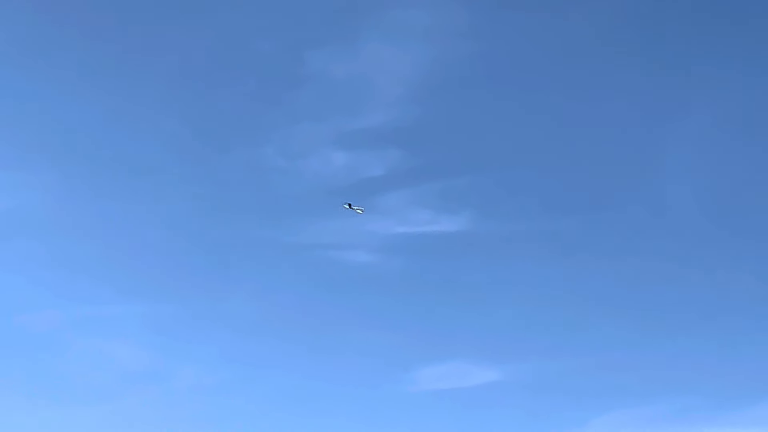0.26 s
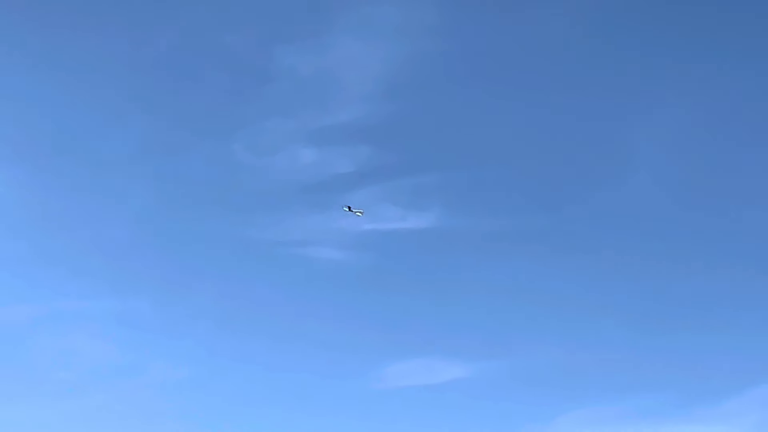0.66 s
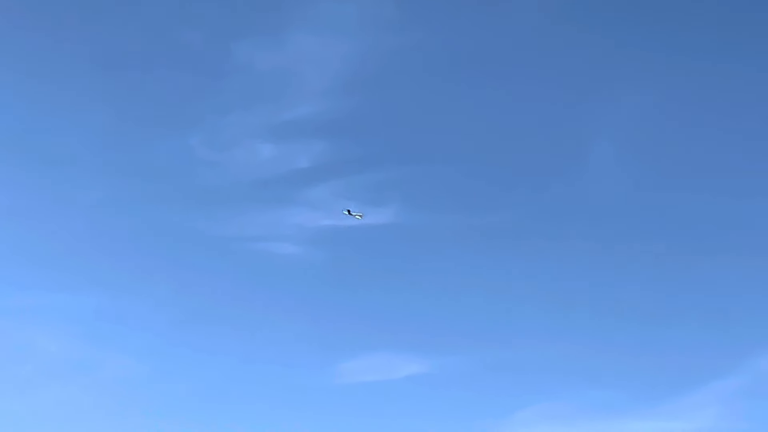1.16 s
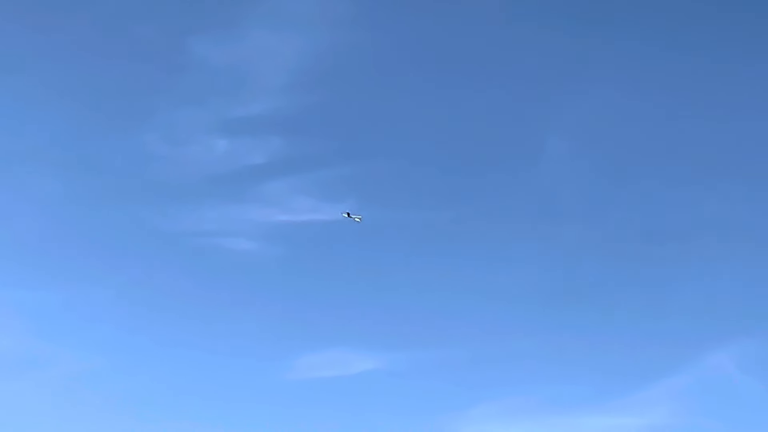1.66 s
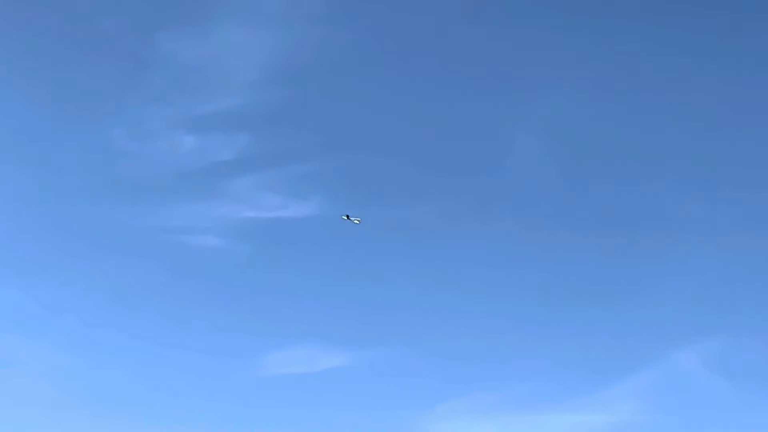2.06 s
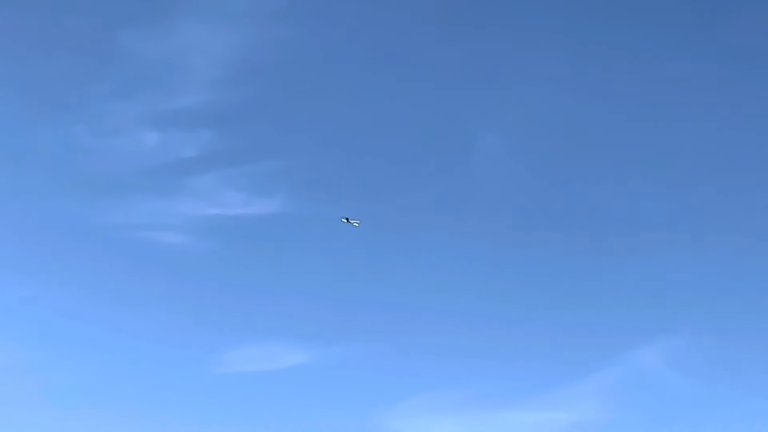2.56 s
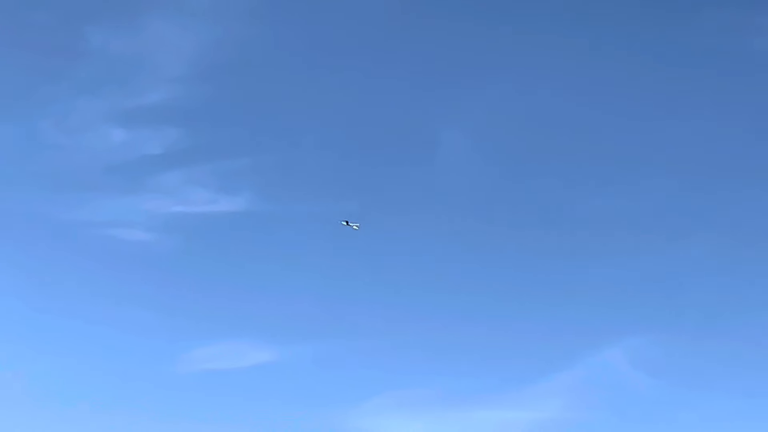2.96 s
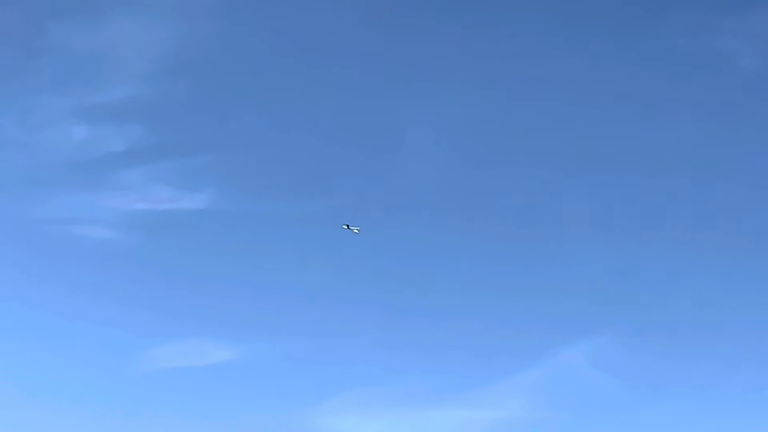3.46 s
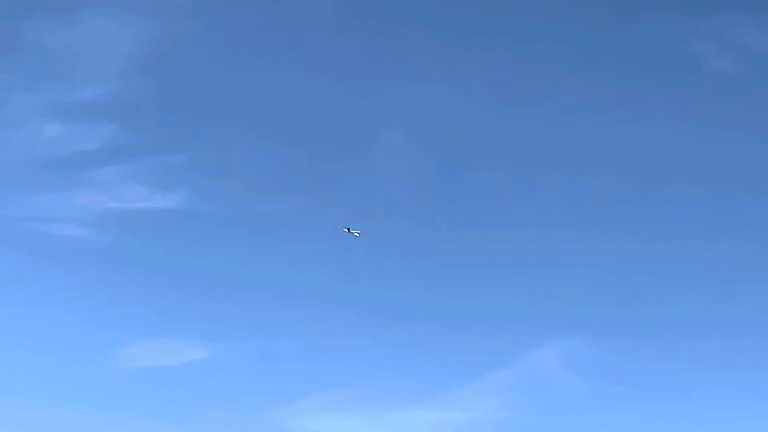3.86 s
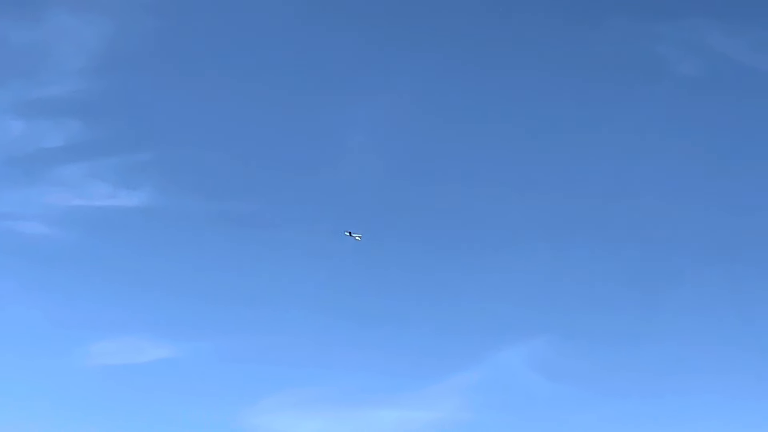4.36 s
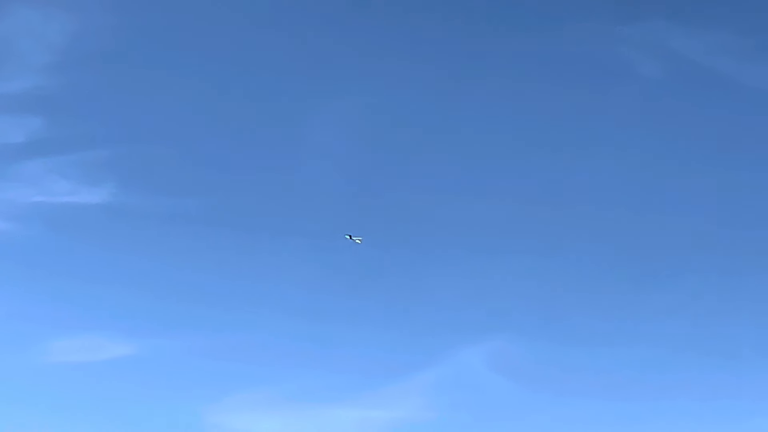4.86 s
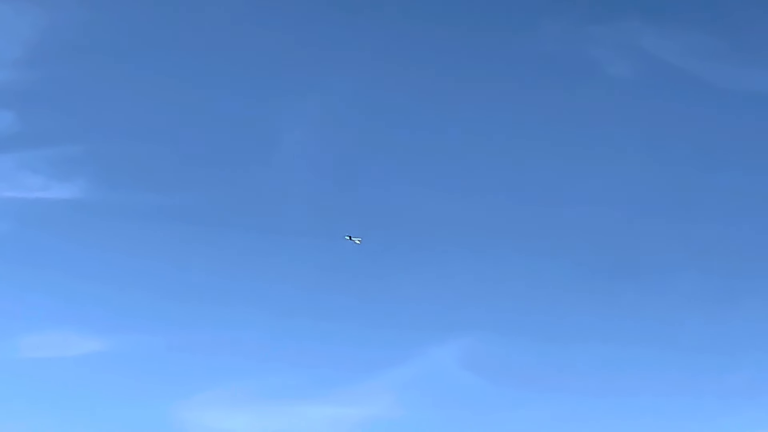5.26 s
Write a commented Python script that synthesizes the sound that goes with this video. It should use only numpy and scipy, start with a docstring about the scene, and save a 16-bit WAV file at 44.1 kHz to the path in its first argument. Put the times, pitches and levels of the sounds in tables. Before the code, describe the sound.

A distant jet plane climbs away outdoors, heard throughout about five and a half seconds as a deep, steady rumble with a crackling roar above it. The roar is strongest and raspiest in the first second, wavering and growing duller, with brief hollow swells drifting through the rumble. From the start, wind buffets the microphone with low flutter and irregular thuds, hardest between 1 and 1.6 seconds. Then the wind drops to a lull, and the roar sinks to its softest around 3 seconds while the rumble carries on. Gusts return at about 3.8 seconds and keep thumping until the end. The roar swells again from about 4.5 to 5.3 seconds, more muffled than before. One very faint dry tick sounds close by near 3.4 seconds, and two more near 4.5 seconds.

```python
"""A deep rumble and a crackling roar: a twin-engine jet climbs away under an open sky.
The air makes its exhaust noise swell, fade and grow duller with distance. Gusts buffet the
microphone and throw eddies at its ports, with a lull in the middle. A few faint ticks sound close by."""
import sys
import numpy as np
from scipy import signal
from scipy.fft import rfft, irfft, next_fast_len
from scipy.io import wavfile
from scipy.ndimage import uniform_filter1d, map_coordinates

SR = 44100
rng = np.random.default_rng(int(sys.argv[2]) if len(sys.argv) > 2 else 0)


def unload_audio(sound):
    """Save the sound as a 16-bit wav file, at the path given as the first command line argument."""
    columns = np.transpose(np.atleast_2d(sound))
    # keep every value between -1 and 1, then stretch to whole-number steps
    steps = np.round(np.clip(columns, -1, 1) * 32767)
    wavfile.write(sys.argv[1], SR, steps.astype(np.int16))


N = 243431
TIME_S = np.arange(N) / SR

# Jet noise through the air. Each row: time in seconds, roar and rasp in dB before their trims.
JET_LEVELS = [(0.1, -43, -46.5), (0.13, -39, -45), (0.31, -36.5, -49), (0.46, -39.5, -48), (0.66, -35, -47),
              (0.87, -46, -56), (1.1, -38, -46.5), (1.28, -43.5, -57), (1.71, -42, -52), (1.98, -44.5, -57),
              (2.01, -42, -51.5), (2.27, -52.5, -61), (2.51, -48, -57), (3.06, -51.5, -63),
              (3.08, -55, -59.5), (4.12, -48, -63), (4.53, -43, -54.5), (4.62, -50, -58.5),
              (4.7, -35.5, -57.5), (4.78, -44.5, -59.5), (4.99, -37.5, -56), (5.24, -43, -59),
              (5.3, -40.5, -53), (5.45, -48.5, -57)]
# Rumble dips. Each row: centre in seconds, half length in seconds, change in dB.
RUMBLE_DIPS = [(1.882, .09, -4), (2.456, 0.041, -8), (3.122, .04, -4), (3.62, .08, -1.5)]
# Hollow swells. Each row: centre in seconds, half length in seconds, pitch in Hz, level in dB.
RUMBLE_SWELLS = [(.24, .11, 469.9, -31.5), (.95, .12, 278, -28), (1.544, .14, 369.9, -38),
                 (2.105, 0.032, 270.8, -30), (2.525, 0.14, 259.7, -37.5), (2.87, 0.12, 219.7, -40.5),
                 (3.451, .1, 286.5, -37), (4.028, .18, 374.7, -38), (4.969, 0.2, 319.8, -32.5)]
# Gusts, short on long. Each row: start and end in seconds, buffet in dB, flutter in dB,
# flutter difference between the ports from 0 to 1.
WIND_GUSTS = [(0, 1.6, -27, -31.5, 0.73), (.15, .26, -28.5, -25, 0.44), (1.06, 1.147, -25.5, -25, .6),
              (1.3, 1.586, -24.5, -29, 0.85), (2.7, 2.93, -42, -42.5, 0.8), (3.8, 5.48, -33, -40.5, 0.3),
              (4.38, 4.68, -26.5, -30, 0.4), (4.76, 5.06, -26.5, -28, 0.44), (5.25, 5.36, -26.5, -35, 0.48)]
# Strong eddies. Each row: centre in seconds, peak in dB, pitch in Hz, half length in cycles.
WIND_EDDIES = [(0.164, -17.5, 63.3, 1.5), (.182, -16.5, 198.5, 1.4), (.535, -14.5, 130, 1.4),
               (0.541, -12, 309, 1.05), (.741, -20, 208, 1.05), (.83, -16, 140, 0.66),
               (.996, -15.5, 360, 0.94), (1.057, -11, 129, 0.74), (1.144, -9, 115, 0.27),
               (1.251, -16, 78, 0.57), (1.317, -9.5, 84, 1.15), (1.358, -17, 167.3, 0.9),
               (1.47, -20.5, 158, 1.2), (1.523, -10, 229, 0.93), (1.546, -24, 612, 1.1),
               (1.567, -9, 100, 0.43), (1.63, -9, 156, 0.28), (3.779, -22.5, 103.5, 1.3),
               (3.857, -25, 95.2, 0.75), (4.109, -22.5, 89, 0.96), (4.359, -19, 62, 1.7),
               (4.494, -18, 99, 1.1), (4.811, -15, 157.4, 1.6), (4.879, -18, 51.8, 1.7),
               (5.087, -17.5, 118.4, 1.46), (5.247, -14.5, 72, 0.71), (5.41, -18, 65.06, 1),
               (5.431, -15.5, 138.2, 0.55)]
# Ticks. Each row: start in seconds, level in dB, treble corner in Hz, tail T60 in seconds,
# treble fall in dB per octave.
NEAR_TICKS = [(3.441, -57.5, 2700, .17, 40.5), (4.524, -56.5, 2980, 0.25, 14.5),
              (4.557, -62, 2900, .42, 21.5)]
# Noise spectra. Each row: frequency in Hz, relative density in dB.
RUMBLE_SPECTRUM = [(18, -48.5), (33, -16), (55, 1), (110, 0.5), (175, -2.5), (255, -2), (340, -11),
                   (450, -16), (650, -24), (1200, -58.5), (3000, -120)]
ROAR_SPECTRUM = [(100, -28.5), (300, -1.5), (520, 4), (660, -1), (800, 1.5), (1000, -2), (1200, -14.5),
                 (1500, -37), (3000, -92)]
RASP_SPECTRUM = [(800, -33.5), (1200, -4.5), (1450, 1), (1650, -2), (2000, -10.5), (2300, -22), (2600, -33),
                 (3100, -47), (4500, -67.5), (8000, -100)]
BUFFET_SPECTRUM = [(15, -54), (26, -24.5), (42, -6.5), (62, 0.5), (90, -1), (130, -6.5), (200, -19.5),
                   (400, -42), (2000, -110)]
FLUTTER_SPECTRUM = [(60, -26), (130, -1.5), (200, 3), (290, 1), (400, -10), (520, -15), (680, -33),
                    (1100, -39.5), (2000, -56.5), (4000, -100)]
HISS_SPECTRUM = [(100, 3.5), (3000, -1), (5000, -0.5), (6500, -9.5), (8000, -5), (11000, -7.5),
                 (12500, -37)]
# Stereo likeness. Each row: frequency in Hz, left-right correlation from 0 to 1.
JET_CORRELATION = [(60, 0.94), (140, 0.87), (300, 1), (550, .8), (800, 0.62), (1100, 1), (1300, 0.09),
                   (1550, 0.59), (1800, 0.24), (2200, 1)]
WIND_CORRELATION = [(50, .94), (90, 0.91), (140, 1), (210, 1), (320, 0.93), (500, 1)]


def amp(db):
    """Decibels to gain."""
    return 10 ** (np.asarray(db) / 20)


def unit(x):
    """x at rms 1."""
    return x / np.sqrt(np.mean(x ** 2) + 1e-20)


def along(points, hz):
    """(Hz, value) points read on a log axis."""
    knots_hz, values = np.transpose(points)
    return np.interp(np.log(hz + 1), np.log(knots_hz + 1), values)


def curves(rows):
    """One value per sample for each column after the time."""
    knots_s, *columns = np.transpose(rows)
    return [np.interp(TIME_S, knots_s, column) for column in columns]


def hump(centre_s, half_s):
    """Bell curve, peak 1."""
    return np.exp(-0.5 * ((TIME_S - centre_s) / half_s) ** 2)


def wobble(rate_hz):
    """Smooth curve through random knots."""
    knots = rng.standard_normal(int(N * rate_hz / SR) + 4)
    return map_coordinates(knots, [TIME_S * rate_hz])


def white():
    """Two independent white noises."""
    return rng.standard_normal((2, N))


def filtered(x, response):
    """x through a gain given as a function of Hz."""
    size = next_fast_len(N + SR // 2)
    return irfft(rfft(x, size) * response(np.fft.rfftfreq(size, 1 / SR)), size)[..., :N]


def spread(pair, spectrum, correlation):
    """Independent pair to stereo at rms 1, with the given spectrum and correlation."""
    def response(hz):
        angle = np.arccos(np.clip(along(correlation, hz), -1, 1)) / 2
        return amp(along(spectrum, hz)) * [np.cos(angle), np.sin(angle)]
    mid, side = filtered(pair, response)
    return unit(np.array([mid + side, mid - side]))


def steadied(x, span_s):
    """x with swells longer than span_s evened out."""
    size = max(int(span_s * SR), 2)
    power = uniform_filter1d(uniform_filter1d(np.mean(x ** 2, axis=0), size), size)
    return x / np.sqrt(np.abs(power) + 1e-9)


def turbulent_air(pair, depth_db):
    """Turbulence briefly focuses and thins narrow bands."""
    spectra = signal.stft(pair, nperseg=2048)[2]
    patches = uniform_filter1d(rng.standard_normal(spectra.shape[1:]), size=3, axis=0)
    patches = uniform_filter1d(patches, size=8, axis=1)
    return signal.istft(spectra * amp(depth_db * unit(patches)), nperseg=2048)[1][:, :N]


def exhaust(shocks_per_s, shock_db):
    """Hot jet crackle: mixing noise plus sparse, uneven shocks."""
    shocks = (rng.random((2, N)) < shocks_per_s / SR) * white()
    return turbulent_air(white() + amp(shock_db) * unit(shocks), depth_db=2.0)


def jet(fade_db_per_s=0.37, roar_trim_db=4, rasp_trim_db=3):
    """Large plume eddies rumble, small ones roar and rasp; turbulent air makes the highs flicker most."""
    roar_db, rasp_db = curves(JET_LEVELS)
    dips_db = sum(db * hump(centre_s, half_s) for centre_s, half_s, db in RUMBLE_DIPS)
    rumble_db = -34 - fade_db_per_s * TIME_S + dips_db
    flicker = wobble(rate_hz=17)
    rumble = steadied(spread(white(), RUMBLE_SPECTRUM, JET_CORRELATION), span_s=0.16)
    rumble *= amp(rumble_db + 0.53 * flicker)
    roar = spread(exhaust(shocks_per_s=260, shock_db=-4), ROAR_SPECTRUM, JET_CORRELATION)
    roar *= amp(roar_db + roar_trim_db + 0.7 * flicker)
    roar *= amp([[0.4], [-0.4]])  # slightly left
    rasp = spread(exhaust(shocks_per_s=630, shock_db=-5.5), RASP_SPECTRUM, JET_CORRELATION)
    rasp *= amp(rasp_db + rasp_trim_db + 1.1 * flicker)
    return rumble + roar + rasp


def swells(half_width_hz=52, side_gain=0.3):
    """A band of the rumble stands out and glides as the sound path changes."""
    pitch_hz, = curves([(centre_s, hz) for centre_s, _, hz, _ in RUMBLE_SWELLS])
    power = sum((amp(db) * hump(centre_s, half_s)) ** 2 for centre_s, half_s, _, db in RUMBLE_SWELLS)
    phase = 2 * np.pi * np.cumsum(pitch_hz) / SR

    def band():
        slow = filtered(white(), lambda hz: 1 / (1 + (hz / half_width_hz) ** 3))
        return unit(np.sum(steadied(slow, span_s=0.11) * [np.cos(phase), np.sin(phase)], axis=0))
    mid, side = band(), side_gain * band()
    return np.sqrt(power) * np.array([mid + side, mid - side])


def gust(start_s, end_s, rise_s=0.085, fall_s=0.11):
    """Gust envelope: builds, holds from start to end, dies away."""
    return np.interp(TIME_S, [start_s - rise_s, start_s, end_s, end_s + fall_s], [0, 1, 1, 0])


def wind(wake_db=-15, wake_half_s=0.013):
    """Gusts push both ports together; lumpy flutter differs between them and flares at each eddy."""
    _, _, buffet_db, flutter_db, difference = np.transpose(WIND_GUSTS)
    gust_power = np.array([gust(start_s, end_s) for start_s, end_s, *_ in WIND_GUSTS]) ** 2
    wake_power = sum((amp(db + wake_db) * hump(centre_s, wake_half_s)) ** 2
                     for centre_s, db, _, _ in WIND_EDDIES)
    buffet = steadied(spread(white(), BUFFET_SPECTRUM, WIND_CORRELATION), span_s=0.076)
    buffet *= np.sqrt(amp(buffet_db) ** 2 @ gust_power)
    lumps_db = 2.7 * np.array([wobble(rate_hz=55), wobble(rate_hz=55)])
    flutter = amp(lumps_db) * spread(white(), FLUTTER_SPECTRUM, [(100, 0.0037)])
    mid, side = steadied(flutter, span_s=0.031)
    mid *= np.sqrt(amp(flutter_db) ** 2 @ gust_power + wake_power)
    side *= np.sqrt((amp(flutter_db) * difference) ** 2 @ gust_power)
    return buffet + np.array([mid + side, mid - side])


def hiss(level_db=-88.5):
    """Faint, steady microphone noise."""
    return amp(level_db) * spread(white(), HISS_SPECTRUM, [(1000, 0.29)])


def eddies(shed_ratio=2.1, shed_db=-11.5, max_port_delay_s=0.00036):
    """Each eddy thuds on the ports and sheds a smaller, higher one."""
    out = np.zeros((2, N))
    for centre_s, db, hz, cycles in WIND_EDDIES:
        thud_turns, shed_turns, side = rng.random(3)
        half_s = cycles / hz
        near = np.abs(TIME_S - centre_s) < 10 * half_s
        age_s = TIME_S[near] - centre_s + max_port_delay_s * (side - 0.5) * np.array([[1], [-1]])
        thud = np.cos(2 * np.pi * (hz * age_s + thud_turns))
        shed = amp(shed_db) * np.cos(2 * np.pi * (shed_ratio * hz * age_s + shed_turns))
        out[:, near] += amp(db) * np.exp(-0.5 * (age_s / half_s) ** 2) * (thud + shed)
    return out


def ticks(crack_t60_s=0.06, tail_db=-12):
    """Small dry contacts: a crack, then a short scatter."""
    out = np.zeros((2, N))
    for start_s, db, corner_hz, tail_t60_s, fall_db_per_oct in NEAR_TICKS:
        age_s = np.maximum(TIME_S - start_s, 0)
        crack = amp(-60 * age_s / crack_t60_s)
        tail = amp(tail_db - 60 * age_s / tail_t60_s)
        envelope = (TIME_S >= start_s) * (crack + tail)
        spectrum = [(corner_hz / 3, -12), (corner_hz * 0.75, 0),
                    (corner_hz, 0), (corner_hz * 4, -2 * fall_db_per_oct)]
        rms = amp(db) * np.sqrt(np.mean(envelope ** 2))
        out += rms * spread(envelope * white(), spectrum, [(1000, 0.9)])
    return out


def scene():
    """Jet, wind and ticks over microphone hiss."""
    return hiss() + jet() + swells() + wind() + eddies() + ticks()


def record(dry, whine_hz=9600, whine_db=-63, cutoff_hz=15800):
    """A very faint whine flutters with the rumble; a steep low-pass limits the band."""
    whine = amp(whine_db) * dry * np.cos(2 * np.pi * whine_hz * TIME_S)
    return filtered(dry + whine, lambda hz: 1 / (1 + (hz / cutoff_hz) ** 60))


dry = scene()
out = record(dry)
unload_audio(out)
```